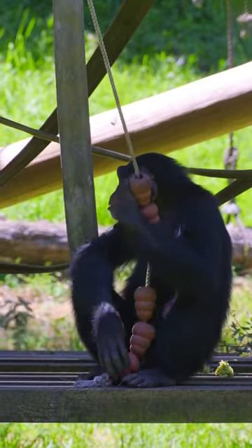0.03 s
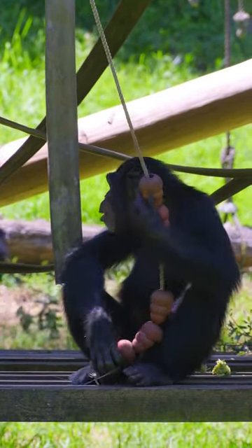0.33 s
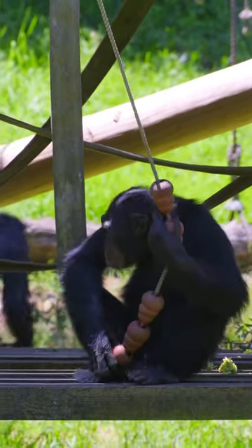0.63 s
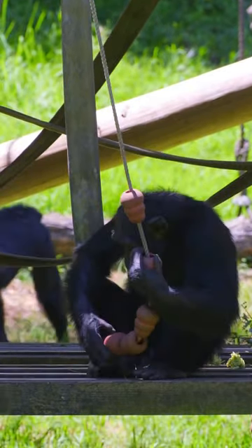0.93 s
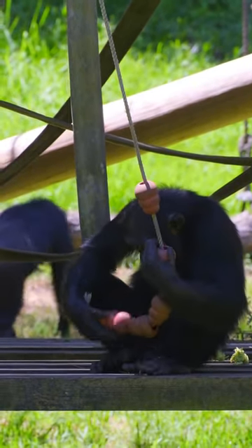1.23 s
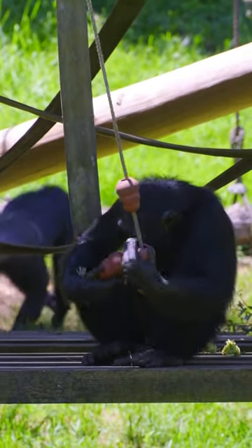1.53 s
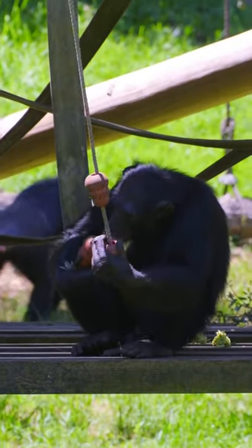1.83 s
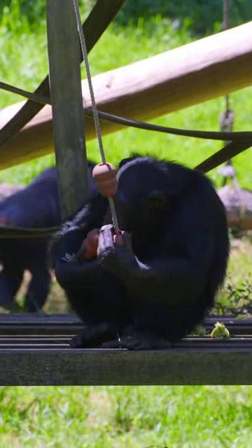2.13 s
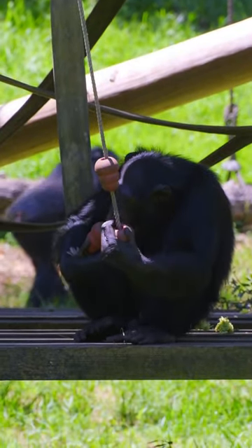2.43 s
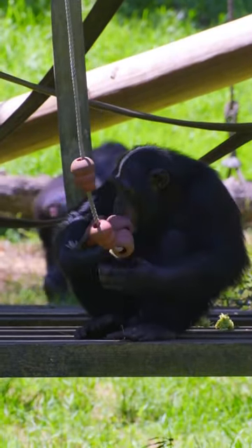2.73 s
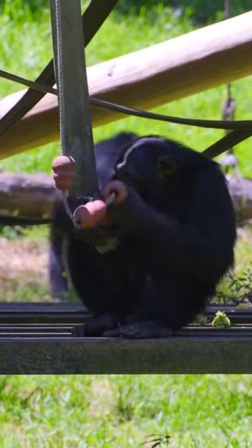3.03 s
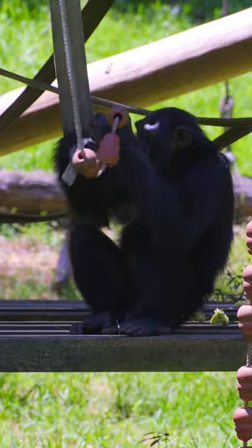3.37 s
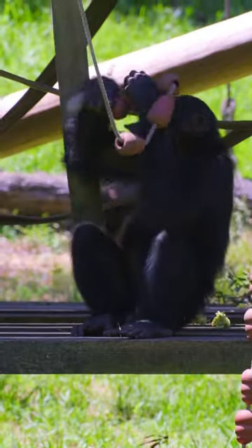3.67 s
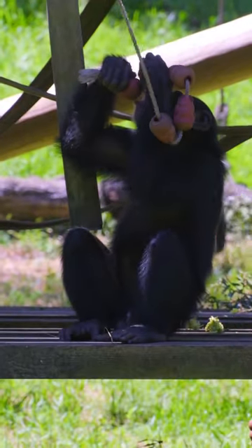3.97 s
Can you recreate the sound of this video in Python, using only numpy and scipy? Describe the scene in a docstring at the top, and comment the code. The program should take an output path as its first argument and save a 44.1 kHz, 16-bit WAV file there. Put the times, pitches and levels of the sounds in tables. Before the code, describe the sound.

A dense, high-pitched cicada buzz runs unbroken outdoors for the whole four seconds. Nearer insects add thin ringing tones, one joining at about 1 second; just before 3 seconds these give way to a higher buzz. A faint distant rumble stays underneath throughout. At around 3.4 seconds there is a small, brief squeak while the chorus carries on.

```python
"""A sunny outdoor enclosure, where cicadas buzz without a break in the trees all around.
Each cicada clicks its tymbals (small drum-like plates) hundreds of times a second, and the leaves
blur the clicks into a buzz. Nearer insects join in and drop out over the chorus.
Underneath lie a faint distant rumble, a thin hum and a light breeze.
Near the end something gives a small squeak."""
import sys
import numpy as np
from scipy import signal
from scipy.fft import rfft, irfft
from scipy.io import wavfile

SR = 44100
rng = np.random.default_rng(int(sys.argv[2]) if len(sys.argv) > 2 else 0)


def transcribe(u):
    """Save the signal u as a 16-bit wav file named by the first command-line argument.

    u: samples, shape (n,) or (channels, n), limited to [-1, 1]; the rate is SR.
    q: integer samples, one column per channel.
    """
    v = np.clip(np.atleast_2d(u).T, -1, 1)
    q = np.round(v * 32767).astype(np.int16)
    wavfile.write(sys.argv[1], SR, q)


N = 176400
T = np.arange(N) / SR   # the time of each sample, in seconds
HZ = np.maximum(np.fft.rfftfreq(N, 1 / SR), 1)   # the frequencies of a spectrum, kept above zero


def chorus():
    """Many cicadas merge into one gently wavering hiss."""
    # The tone of the whole chorus. Each row: frequency in Hz, relative level in dB.
    spectrum = [(1500, -62), (2800, -43), (3500, -32), (4200, -27), (5000, -17.5), (5600, -13), (6300, -9),
                (7200, -5.5), (7800, -2.5), (8250, -1), (9000, -1.5), (9500, -4.5), (10000, -11),
                (10500, -16.5), (11000, -23.5), (11500, -26.5), (12600, -27.5), (14100, -23.5),
                (15600, -29)]
    # Its slow rise and fall. Each row: time in seconds, change of level in dB.
    swell = [(0, 0.6), (.7, 0), (1.2, -0.1), (1.5, .5), (2.0, -0.1), (2.4, 0), (2.8, -0.5), (3.2, 0.2),
             (4, 0.5)]
    level_db, sway_db = -28, 0.31
    buzz = coloured(insects(clicks_per_s=420, count=12), spectrum)
    return from_db(level_db + sway_db * drift(4.1)) * curve(swell) * buzz


def singers():
    """Nearer cicadas come and go, their bodies ringing with their own clicks."""
    # Each row: start and end in seconds, level in dB, the body's ringing pitch in Hz,
    # the width of that ringing in Hz, clicks per second.
    songs = [(-1, 1.65, -45, 10100, 1000, 390), (-1, 1.3, -54, 4400, 900, 410),
             (-1, 2.85, -36, 6620, 620, 470), (.95, 2.85, -37, 6350, 800, 320),
             (.95, 5, -43.5, 5750, 450, 380), (2.22, 2.85, -48.5, 4750, 750, 350),
             (3.4, 3.6, -49.5, 4700, 450, 350), (3.9, 5, -48.5, 4750, 600, 350),
             (2.8, 5, -33.8, 8250, 1000, 285)]
    return sum(from_db(db) * song_fade(start, end) * resonate(insects(rate, count=2), hz, width)
               for start, end, db, hz, width, rate in songs)


def whines():
    """Sharp ringing in the song: noise narrowed until it is almost a single note."""
    # Each row: start and end in seconds, level in dB, pitch in Hz, width in Hz.
    notes = [(.2, 2.9, -40, 6826, 48), (1.0, 5, -48.5, 6052, 14), (2.5, 5, -49.5, 5740, 45),
             (3.0, 5, -46.5, 5400, 65), (2.5, 5, -58.5, 4595, 35), (2.5, 5, -56, 4942, 35),
             (1, 5, -45, 8720, 16), (1, 3.4, -41, 8220, 70), (-2, 5, -46, 8965, 40),
             (-2, .9, -47, 9850, 20), (-2, 0.82, -55, 10435, 40), (-2, .9, -57, 10860, 22)]
    return sum(from_db(db) * song_fade(start, end) * resonate(noise(), hz, width)
               for start, end, db, hz, width in notes)


def insects(clicks_per_s, count):
    """Several insects click together, some slower and some faster."""
    return sum(tymbal(clicks_per_s * share) for share in np.linspace(.85, 1.15, count))


def tymbal(clicks_per_s):
    """One insect's nearly regular clicks, heard both directly and by way of the leaves."""
    wander, jitter = .03, .12   # as a share of the click rate, and of the gap between clicks
    spread_db, direct_db = 2.2, -3.2
    cycles = rng.random() + np.cumsum(clicks_per_s * (1 + wander * drift(2))) / SR
    on_time = np.flatnonzero(np.diff(np.floor(cycles)) > 0)   # one click for each full cycle
    lateness, strength = rng.standard_normal((len(on_time), 2)).T
    click_samples = (on_time + lateness * jitter * SR / clicks_per_s).astype(int) % N
    clicks = np.zeros(N)
    clicks[click_samples] = from_db(spread_db * strength)
    return rms_one(from_db(direct_db) * clicks + foliage_echo(clicks))


def song_fade(start, end, fade_s=0.17):
    """A song swells, holds and fades."""
    seconds_inside = np.minimum(T - start, end - T)
    return np.sqrt(np.clip(seconds_inside / fade_s + .5, 0, 1))


def foliage_echo(sound, decay_s=.25):
    """Leaves and trunks send back a blur of echoes that drops 60 dB in decay_s seconds."""
    tail = noise() * from_db(-60 * np.minimum(T / decay_s, 2))
    return irfft(rfft(sound) * rfft(tail / np.linalg.norm(tail)), N)


def squeaks():
    """Short sliding tones with a rasp and a faint echo."""
    # Each row: start and length in seconds, level at the middle in dB, first and last pitch in Hz,
    # roughness from 0 to 1.
    slides = [(.64, .13, -53, 400, 435, .15), (3.338, .045, -44, 3230, 3300, .5),
              (3.348, .038, -51, 2200, 2130, .4), (3.367, .015, -35.5, 3130, 3050, .15),
              (3.412, .028, -46.5, 1000, 1130, .25), (3.425, .055, -52, 1120, 1080, .7)]
    rasp_hz, echo_db = 250, -10
    sound = np.zeros(N)
    for start, length, db, first_hz, last_hz, rough in slides:
        progress = np.clip((T - start) / length, 0, 1)
        phase = 2 * np.pi * np.cumsum(first_hz + (last_hz - first_hz) * progress) / SR
        rasp = drift(rasp_hz) * np.sin(phase) + drift(rasp_hz) * np.cos(phase)
        tone = (1 - rough) * np.sin(phase) + rough * rasp
        sound += from_db(db) * np.sin(np.pi * progress) * rms_one(tone)
    return sound + from_db(echo_db) * foliage_echo(sound)


def rumble():
    """A steady distant rumble with a few soft, low swells."""
    # The tone of the rumble. Each row: frequency in Hz, relative level in dB.
    spectrum = [(25, -6), (40, -2), (56, 5), (72, -1), (110, -1), (185, 1.5), (270, -4.5), (500, -5),
                (660, -2), (1000, -4), (1300, -6), (2000, -7.5), (2700, -13), (3400, -20.5), (5000, -19.5)]
    # Each row: peak time and half length in seconds, peak level in dB, pitch in Hz, width in Hz.
    low_swells = [(.45, 0.24, -49, 140, 110), (2.0, 0.12, -51.5, 115, 90), (2.314, 0.09, -45, 117, 80)]
    steady = from_db(-42) * coloured(noise(), spectrum)
    swells = sum(from_db(db) * np.exp(-((T - peak) / half) ** 2) * resonate(noise(), hz, width)
                 for peak, half, db, hz, width in low_swells)
    return steady + swells


def hum():
    """A thin, far-off hum made of narrow bands of noise."""
    # Each row: level in dB, pitch in Hz, width in Hz.
    bands = [(-55.5, 607, 10), (-60, 580, 8.1), (-70.5, 3085, 37)]
    return sum(from_db(db) * resonate(noise(), hz, width) for db, hz, width in bands)


def breeze():
    """Light puffs of air on the microphone make a very deep flutter."""
    # The strength of the puffs. Each row: time in seconds, relative level in dB.
    puffs = [(0.0, -54), (0.43, -40.5), (1.29, -47.5), (1.48, -43), (1.67, -53), (1.73, -35), (1.89, -50),
             (1.95, -39), (2.14, -45), (2.19, -59), (2.24, -41.5), (2.84, -50), (2.88, -39.5),
             (3.22, -43.5), (3.29, -44.5), (4.0, -45)]
    # Their tone. Each pair: frequency in Hz, relative level in dB.
    spectrum = [(4, -22), (9, -2), (21, 2), (27, -19), (36, -32), (90, -45), (300, -80)]
    return from_db(1) * curve(puffs) * coloured(noise(), spectrum)


def noise():
    """An even hiss (white noise)."""
    return rng.standard_normal(N)


def drift(rate_hz):
    """A random wobble of typical size 1, mostly slower than rate_hz."""
    return rms_one(irfft(rfft(noise()) / (1 + (HZ / rate_hz) ** 2), N))


def resonate(sound, hz, width_hz):
    """Make a sound ring: keep a steep-sided band around one pitch, at level 1."""
    detune = (HZ ** 2 - hz ** 2) / (HZ * width_hz)
    return rms_one(irfft(rfft(sound) / (1 + 1j * np.sqrt(2) * detune - detune ** 2), N))


def coloured(sound, spectrum):
    """Shape a sound's tone with rows of frequency in Hz and level in dB, then set it to level 1."""
    hz, db = np.transpose(spectrum)
    gain = from_db(np.interp(np.log(HZ), np.log(hz), db))
    return rms_one(irfft(rfft(sound) * gain, N))


def curve(rows):
    """Join rows of time in seconds and level in dB into a volume curve."""
    return from_db(np.interp(T, *np.transpose(rows)))


def from_db(db):
    """Turn decibels into a number to multiply a sound by."""
    return 10 ** (np.asarray(db) / 20)


def rms_one(sound):
    """Scale a sound so that its average level (root mean square) is 1."""
    return sound / np.sqrt(np.mean(sound ** 2) + 1e-20)


def scene():
    """Everything sits in the centre, alike in both channels."""
    mix = chorus() + singers() + whines() + rumble() + hum() + breeze() + squeaks()
    return np.array([mix, mix])


def record(dry):
    """The very highest treble is cut off steeply."""
    cutoff_hz = 15720
    low_pass = signal.firwin(801, cutoff_hz, window="blackman", fs=SR)
    return signal.fftconvolve(dry, low_pass[None], mode="same", axes=1)


dry = scene()
out = record(dry)
transcribe(out)
```